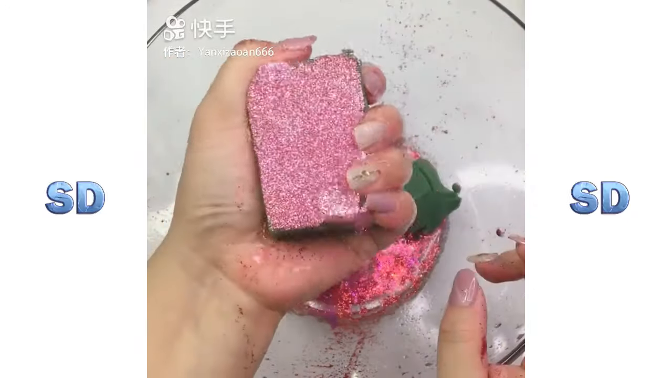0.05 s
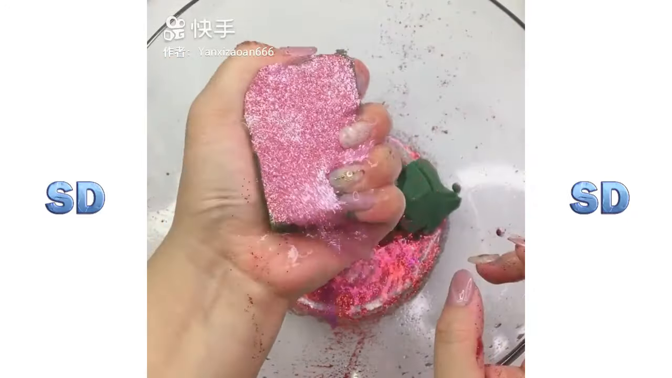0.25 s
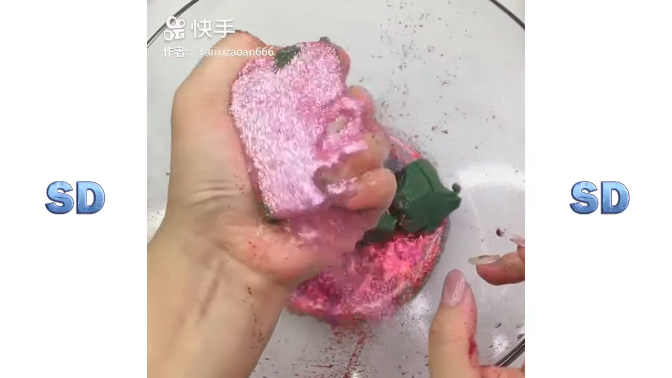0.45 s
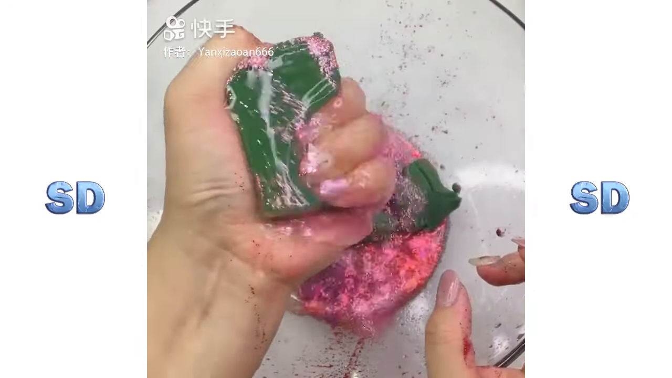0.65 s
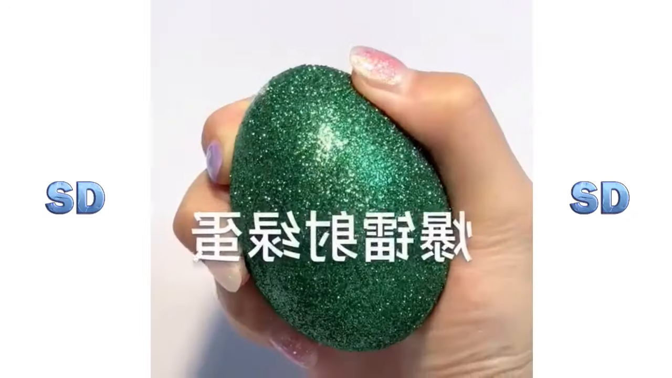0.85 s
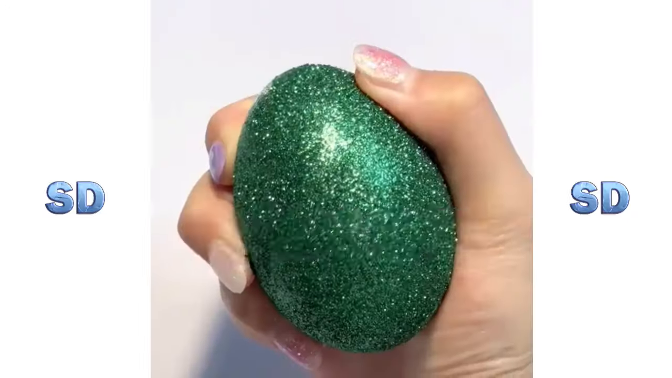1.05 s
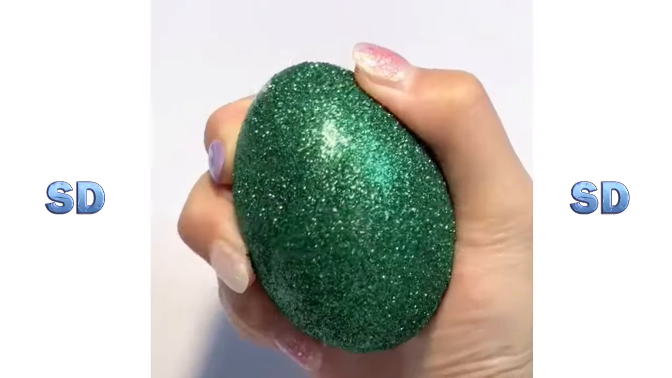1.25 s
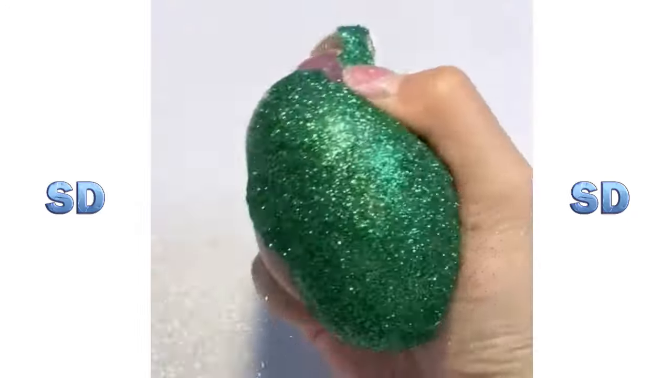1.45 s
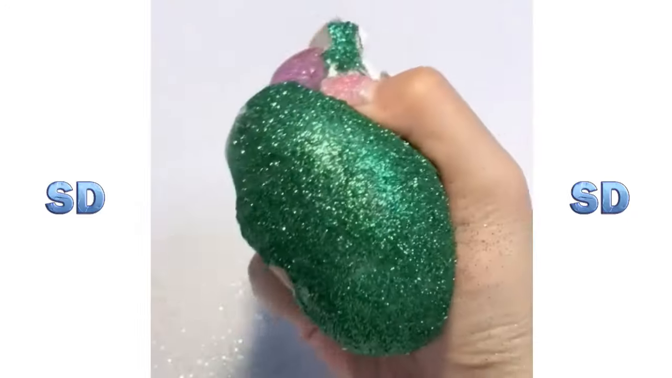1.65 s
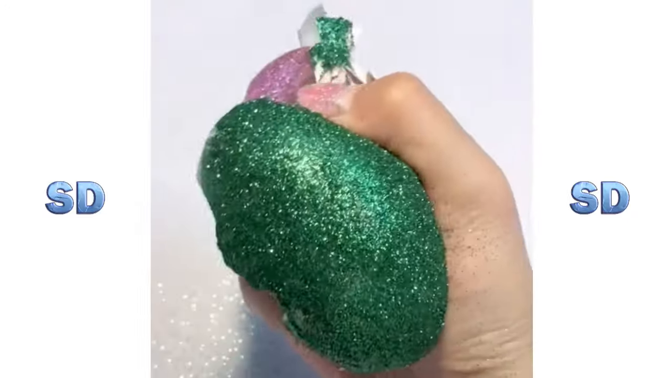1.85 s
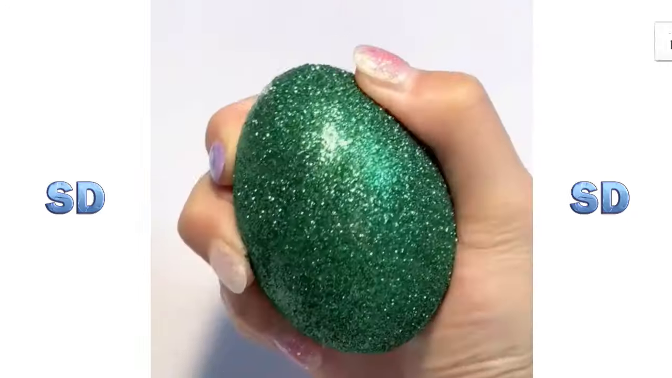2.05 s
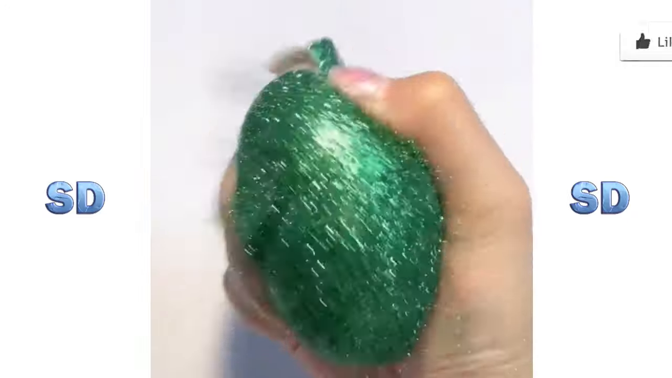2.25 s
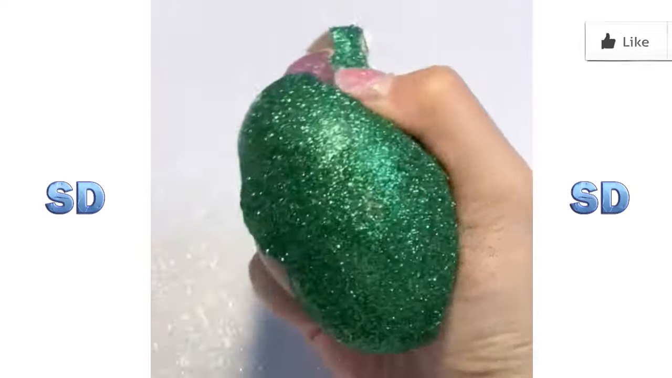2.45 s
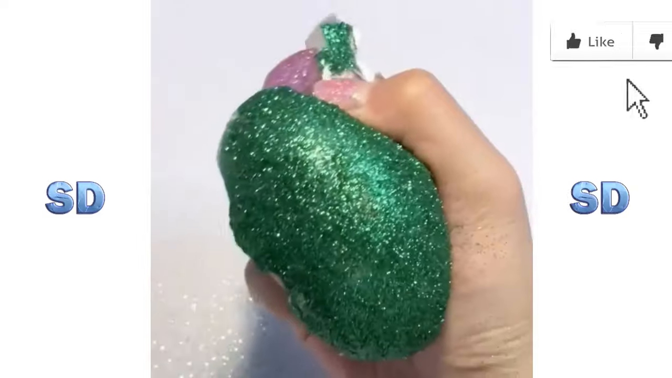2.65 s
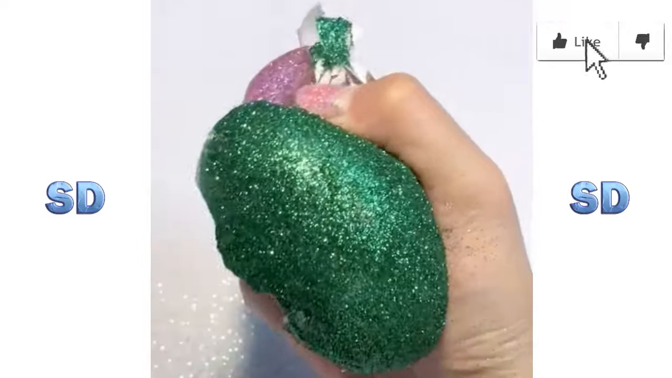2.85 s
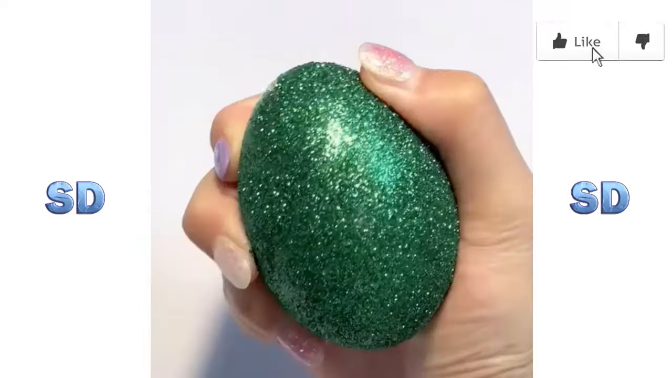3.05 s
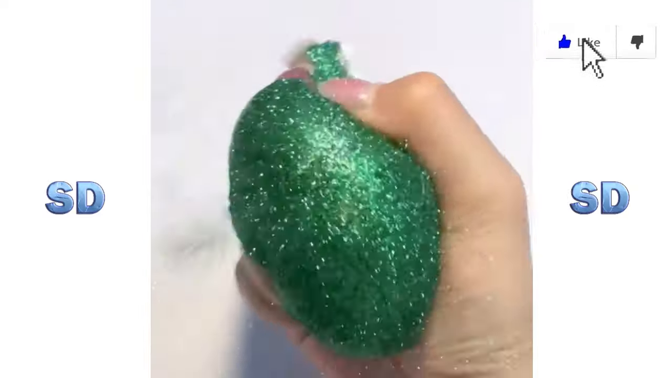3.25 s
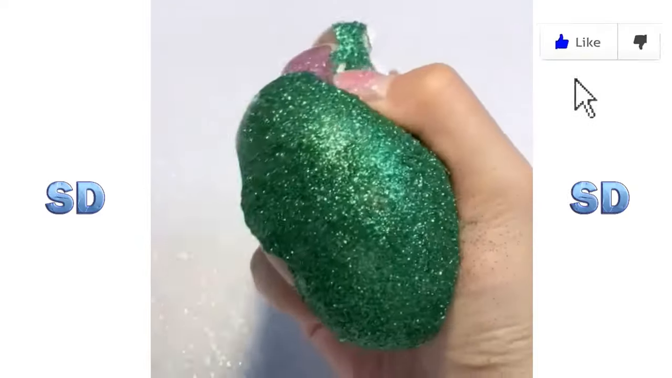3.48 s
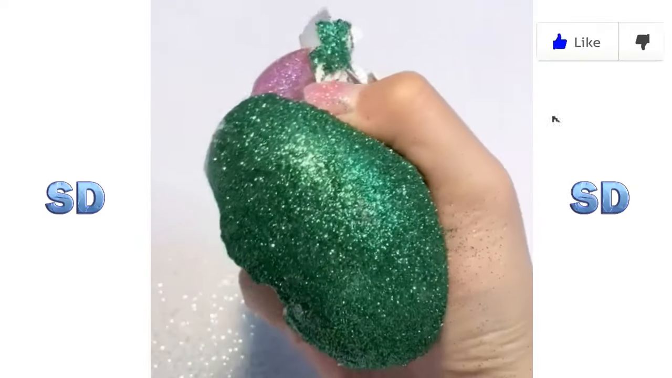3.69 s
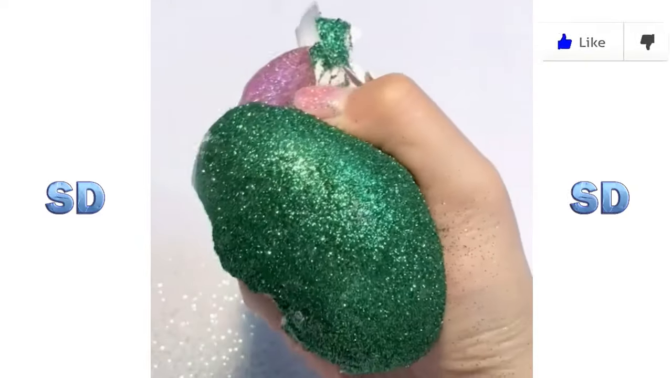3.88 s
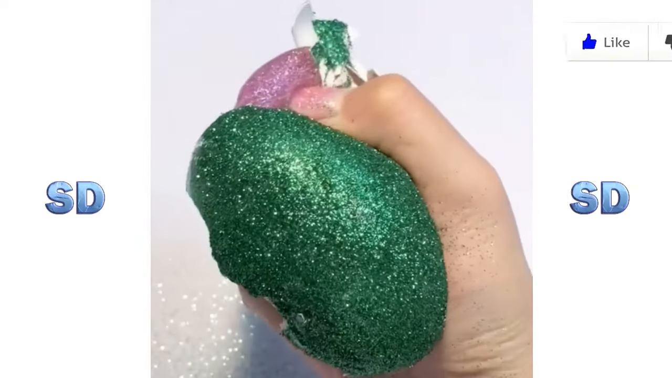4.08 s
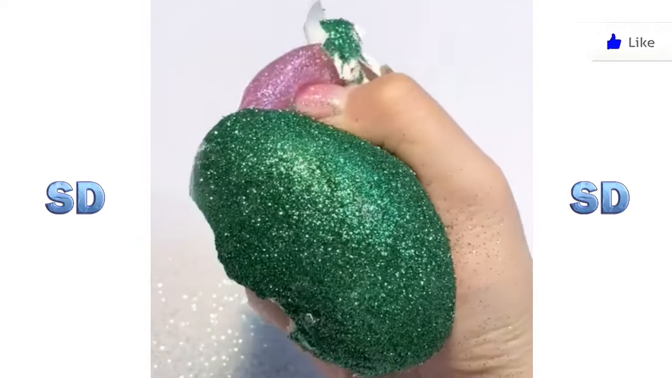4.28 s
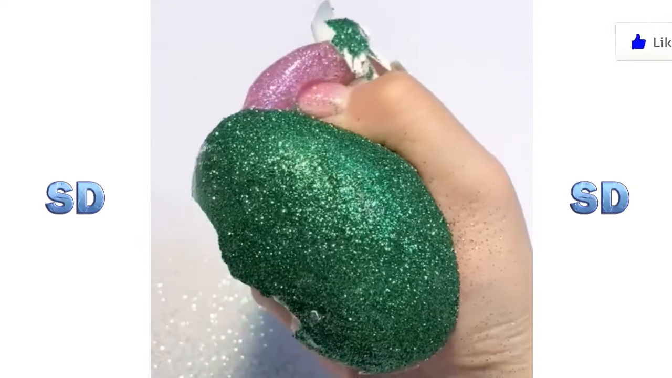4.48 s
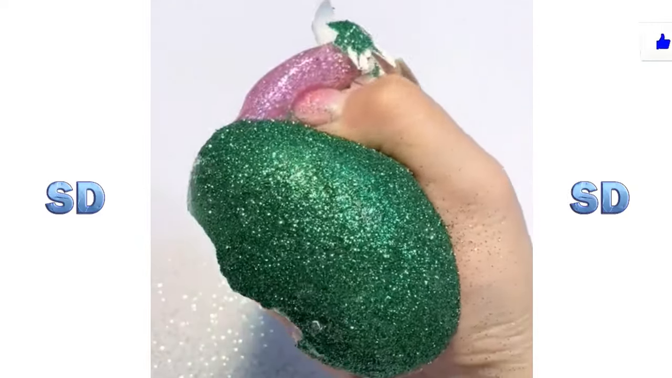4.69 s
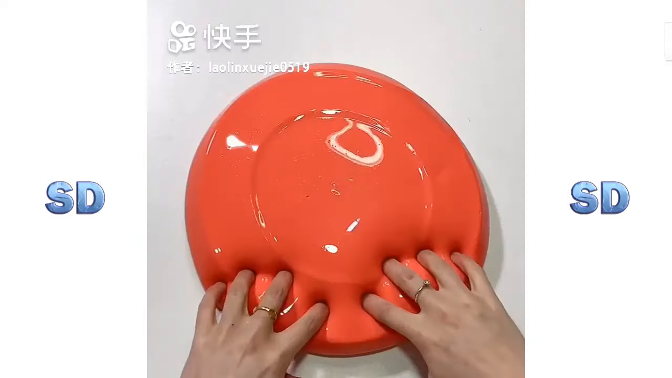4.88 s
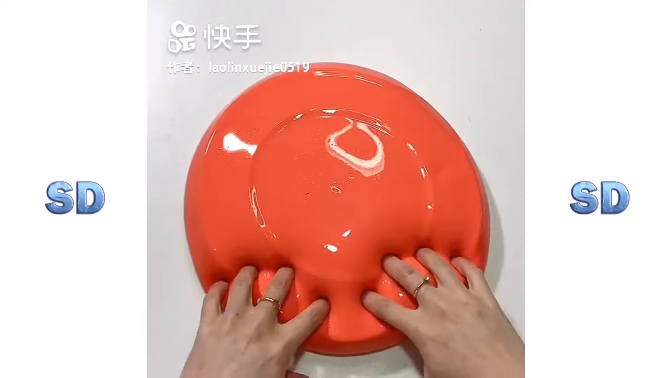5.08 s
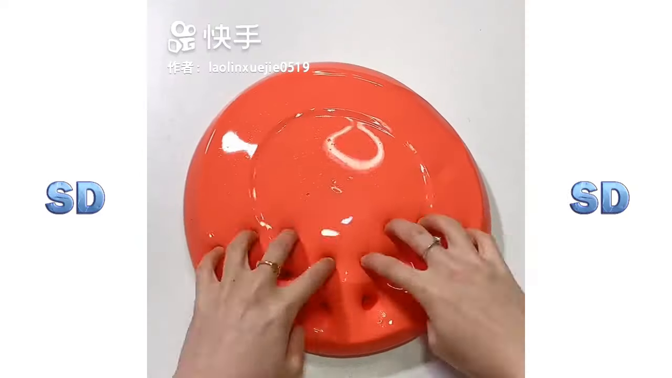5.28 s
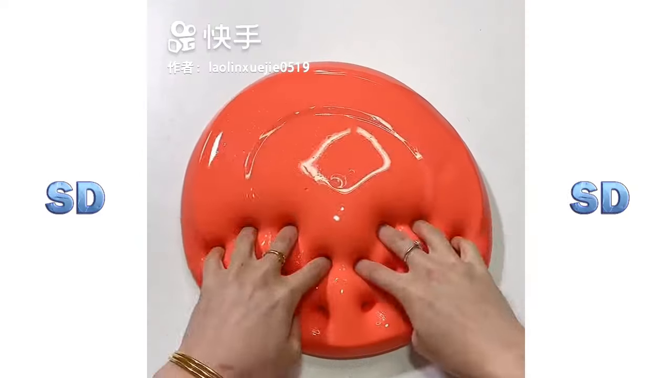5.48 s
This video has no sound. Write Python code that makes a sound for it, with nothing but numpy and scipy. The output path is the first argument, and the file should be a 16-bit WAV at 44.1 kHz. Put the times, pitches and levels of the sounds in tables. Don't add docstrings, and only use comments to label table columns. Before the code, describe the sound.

Three squeezing sounds in a row, dry and close. First, light sparse cracks of foam and its collapsing hiss. Then a much louder putty egg: sharp bright shell snaps, gritty crumbling, a crunchy burst with dull air booms, repeated identically three times, its peaks flattened by a phone limiter. Last, a hushed room with faint rustle, quick finger clicks, a thud, wet hiss and low dish ring, slightly stereo.

```python
import sys
import numpy as np
from scipy import signal
from scipy.fft import rfft, irfft, next_fast_len
from scipy.io import wavfile
from scipy.ndimage import uniform_filter1d

SR = 44100
rng = np.random.default_rng(int(sys.argv[2]) if len(sys.argv) > 2 else 0)


def generate_wav(sig):
    pcm = np.round(np.clip(np.atleast_2d(sig).T, -1, 1) * 32767).astype(np.int16)
    wavfile.write(sys.argv[1], SR, pcm)


def natural_amplitude(level_db):
    exponent = np.asarray(level_db, float) / 20
    return 10 ** exponent


N = 243873
FOAM_END_S, EGG_START_S, EGG_END_S = .778, 1.0, 4.8445

# pitch in Hz, width in Hz, level in dB.
SHELL_MODES = [(3320, 95, -15.5), (3120, 130, -21)]


def foam():
    # start in seconds, peak in dB, ring in Hz,
    # level of the bright part in dB, time to fall 60 dB in seconds.
    big_cracks = [(.3705, -24.5, 9320, -16, .006), (.4028, -25, 5490, -20, .009),
                  (.4199, -22, 4400, -16, .014), (.4274, -17, 4350, -14, .014),
                  (.4403, -11, 4500, -15, .008), (.4528, -14, 4400, -19, .009),
                  (.4622, -14, 4490, -17, .011), (.4887, -15, 9440, -13, .009),
                  (.5071, -13, 4430, -8, .014), (.5114, -17, 2200, -8, .008), (.5312, -19, 5210, -11, .016),
                  (.5498, -10, 4470, -12, .008), (.5927, -27, 990, -4, .012), (.6085, -20, 5800, -14, .01),
                  (.615, -17, 8630, -15, .006), (.6349, -11, 1700, -13, .009), (.638, -13, 6900, -13, .009),
                  (.6662, -16, 7660, -12.5, .013), (.6705, -23, 2620, -12, .016),
                  (.693, -19, 9990, -13, .006), (.7195, -13, 2610, -32, .006), (.7382, -18, 1870, -3, .012),
                  (.7478, -19, 3560, -12, .016), (.7757, -21, 12500, -9, .007)]
    ticks = [(.4236, -23, 5000, -16, .006), (.4565, -27, 7200, -12, .006), (.5215, -25, 10000, -10, .006),
             (.5235, -25, 2200, -14, .008), (.5375, -22, 8500, -12, .007), (.5597, -20, 4600, -14, .008),
             (.5725, -30, 8000, -12, .005), (.578, -29, 7000, -10, .005), (.5905, -22, 8500, -10, .006),
             (.597, -26, 8700, -12, .005), (.6297, -21, 7000, -8, .006), (.6748, -20, 2200, -14, .008),
             (.6827, -22, 5200, -14, .008), (.7013, -21, 4600, -16, .012), (.7525, -20, 4900, -14, .01),
             (.7585, -18, 4000, -14, .008), (.762, -24, 7000, -12, .007)]
    # time in seconds, level in dB.
    grip = [
        (0, -52.5),
        (.37, -50),
        (.47, -46),
        (.53, -38),
        (.58, -43),
        (.7, -41),
        (.76, -38),
        (.776, -41),
    ]
    # pitch in Hz, width in Hz, level in dB.
    bowl_modes = [(2610, 50, -5), (4680, 200, -20)]
    # pitch in Hz, level in dB.
    crumble_colour = [(410, -45), (700, -12.5), (2270, 1), (2590, -2), (5090, -3), (6540, -5), (12500, -9),
                      (15900, -17.5), (16500, -23.5)]
    # pitch in Hz, level in dB.
    room_colour = [(15, -58.5), (25, -35), (46, -10.5), (75, -2.5), (153, -5.5), (216, -11.5), (1200, -25),
                   (1560, -47.5), (2640, -120)]

    grip_db, = in_time(grip)
    crust = cracks(big_cracks + ticks, bowl_modes, [],
                   sharp=3.2, body_db=-15.5, dull_db=-23.5, bright_db=4.5)
    hiss_share = 3.0 * lighter_is_smoother(grip_db + 46)
    crumble = coloured(crumbs(1500, 1.5, sharp=9.6, smooth=hiss_share), crumble_colour)
    crumble = crumbling(grip_db, crust) * with_modes(crumble, bowl_modes, gain_db=-8.0)
    rumble = room(room_colour, -47.5 - .1 * (grip_db + 43.5))
    return (crust + crumble + rumble) * between(-1, FOAM_END_S)


def egg():
    # start in
    # seconds, peak in dB, # ring in Hz, level of the bright part in dB, time to fall 60 dB in seconds.
    shell_cracks = [(1.0675, -20, 6800, -14, .01), (1.0819, -21, 3400, -14, .007),
                    (1.1231, -31, 3250, -17, .009), (1.2645, -22, 3350, -16, .009),
                    (1.2854, -12, 2150, -14, .011), (1.2958, -4.5, 3330, -15, .03),
                    (1.3015, -6, 3290, -15, .02), (1.312, -4, 3140, -15, .017),
                    (1.3186, -4, 3330, -12, .035), (1.3352, -4, 3130, -16, .02),
                    (1.3417, -3, 3310, -11, .03), (1.3582, -13, 3290, -16, .011),
                    (1.3629, -11.5, 3300, -18.5, .018), (1.3784, -22, 3320, -14, .015),
                    (1.3995, -11, 3600, -9, .01), (1.4125, -9, 3600, -8, .008),
                    (1.4148, -6, 3250, -6, .013), (1.5115, -8, 3290, -6, .012),
                    (1.5175, -14, 2300, -9, .009), (1.5265, -5, 3320, -6, .02),
                    (1.7035, -17, 3040, -16, .01), (1.732, -16, 1860, -11, .006), (1.7353, -5, 2850, -20, .014),
              (1.752, -11, 1760, -24, .007), (1.7671, -15, 1870, -22, .008), (1.7757, -6, 4300, -9, .011),
              (1.8007, -9, 2870, -6, .007), (1.817, -21, 6460, -16, .007), (1.8285, -13, 3200, -7, .007),
              (1.8389, -8, 3600, -8, .009), (1.8455, 0, 2000, -7, .016), (1.8592, -9, 8700, -6, .01),
              (1.873, -17, 1750, -13, .009), (1.8927, -5, 5600, -13, .009), (1.8935, -9, 3300, -20, .006),
              (1.9044, -8, 1500, -8, .011), (1.9335, -13, 3300, -20, .006), (1.9329, -5.5, 7200, -14, .012),
              (1.9508, -15, 5140, -10, .01), (1.958, -5, 2300, -11, .009), (1.9641, -5, 7760, -11, .013),
              (1.973, -4, 6530, -12, .013), (1.9816, -4, 7350, -15, .011), (2.0015, -4, 2690, -7, .015),
                    (2.0349, -20, 6580, -10, .008), (2.069, -15, 6530, -14, .01), (2.0762, -4, 6700, -11, .016),
              (2.081, -12, 6480, -14, .01), (2.0844, -6, 6800, -13, .012), (2.1176, -11, 11800, -11, .005),
              (2.1315, -6, 9500, -10, .01), (2.1381, -4, 6780, -17, .01), (2.149, -13, 8750, -9, .018),
              (2.1561, -13, 6520, -12.5, .008), (2.1687, -7, 8700, -9, .01), (2.1804, -6.5, 3680, -8, .014),
              (2.1847, -2, 1600, -6, .028), (2.1959, -9, 3600, -12, .018), (2.203, -9, 1860, -9, .014),
              (2.2153, -5, 6490, -14, .012), (2.2409, -4, 8710, -9, .011), (2.2732, -2, 1990, -8, .022),
              (2.281, -1.5, 5900, -13, .014),
                    (4.246, -3, 1990, -9, .022), (4.2545, -4, 5600, -13, .01), (4.2725, -3, 3230, -6, .022),
             (4.283, -7, 3230, -12, .009), (4.2928, -2, 3150, -12, .025), (4.3086, -9, 8500, -11, .01),
             (4.3202, -2, 2000, -6, .024), (4.3363, -5, 6750, -10, .01), (4.364, -8, 3230, -10, .007),
             (4.3918, -2, 3830, -3, .015), (4.4005, -6, 3600, -8, .01), (4.409, -7, 3170, -8, .018),
             (4.4192, -7, 6000, -14, .006),
                    (4.447, 0, 1100, -6, .018), (4.4626, -3, 3180, -12, .018), (4.4707, -3, 6820, -10, .02),
                   (4.4822, -4.5, 5480, -12, .014), (4.4957, -7, 1960, -12, .009),
                   (4.496, -9, 6600, -14, .008), (4.5153, -5.5, 6410, -14, .009),
                   (4.548, -5, 2050, -9, .009), (4.5565, -13, 1860, -9, .018), (4.568, -5, 3250, -12, .01),
                   (4.5885, 0, 2000, -12, .02), (4.6009, -12, 1950, -9, .012),
                   (4.6074, -7, 4100, -10, .008), (4.613, -5, 1900, -14, .01),
                   (4.6689, -21, 4090, -10, .009), (4.6845, -9, 1920, -11, .009),
                   (4.6961, -10, 4000, -4, .014), (4.7205, -2, 8900, -7, .017),
                   (4.8324, -17, 6550, -8, .006), (4.8418, -19, 1770, -16, .009)]
    ticks = [(1.2259, -30, 5330, -10, .007), (1.2895, -17, 3500, -14, .008), (1.3285, -12, 3300, -14, .012),
             (1.3505, -12, 3200, -14, .012), (1.371, -20, 3300, -14, .012), (1.4105, -19, 2300, -14, .006),
             (1.668, -15, 7000, -8, .007), (1.745, -17, 5500, -9, .005), (1.7635, -22, 1900, -14, .006),
             (1.781, -18, 8800, -9, .008), (1.794, -24, 4000, -10, .005), (1.8105, -25, 6000, -12, .006),
             (1.9115, -22, 1700, -14, .006), (1.918, -22, 3800, -8, .005), (2.062, -24, 4000, -14, .008),
             (2.2755, -6, 2200, -9, .012), (2.287, -10, 3300, -12, .01), (4.263, -12, 2200, -9, .008),
             (4.3005, -9, 6000, -9, .01), (4.331, -10, 8500, -9, .009), (4.342, -11, 6500, -9, .008),
             (4.3505, -14, 6200, -9, .007), (4.3725, -15, 3300, -14, .008), (4.384, -20, 3300, -12, .007),
             (4.4125, -7, 6000, -8, .012), (4.4235, -12, 8500, -12, .006), (4.4578, -12, 1200, -12, .012),
             (4.4755, -9, 2900, -10, .012), (4.5063, -15, 2200, -8, .006), (4.6379, -22, 2040, -13, .009)]
    # time in seconds, level in dB.
    grip = [(1.0, -40), (1.26, -44.5), (1.3, -22), (1.35, -22), (1.39, -34), (1.47, -41), (1.74, -37),
            (2.06, -38), (2.2, -28), (2.25, -36), (2.2925, -23), (4.243, -25), (4.34, -24), (4.375, -35),
            (4.47, -26), (4.53, -36), (4.6, -31), (4.844, -41)]
    # pitch in Hz, width in Hz, level in dB.
    high_modes = [(6600, 700, -9), (8700, 800, -11)]
    # pitch in Hz, level in dB.
    crumble_colour = [(350, -30), (600, -7.5), (3000, 1.5), (3440, -2.5), (4870, -4.5), (6610, 1.5),
                      (15200, -5), (16500, -27.5)]
    # pitch in Hz, level in dB.
    room_colour = [(18, -33.5), (30, -9), (47, 2), (75, -5), (130, 0.5), (210, -5), (330, -9), (620, -16),
                   (1000, -23), (1500, -45.5)]
    loop_start_s, loop_samples = 1.3175, 43008
    fade_in_s, fade_in_db = 0.089, -29

    grip_db, = in_time(grip)
    all_cracks = shell_cracks + ticks
    shell = cracks(all_cracks, SHELL_MODES, high_modes,
                   sharp=2.6, body_db=-7.0, dull_db=-7.5, bright_db=6.5)
    hiss_share = 1.21 * lighter_is_smoother(grip_db + 33)
    crumble = coloured(crumbs(4000, 1.6, sharp=5.2, smooth=hiss_share), crumble_colour)
    crumble = crumbling(grip_db, shell) * with_modes(crumble, SHELL_MODES, gain_db=-1.5)
    out = shell + crumble + burst() + room(room_colour, -34.5 + .2 * (grip_db + 33.5))
    start = round(loop_start_s * SR)
    out[start:start + 3 * loop_samples] = np.tile(out[start:start + loop_samples], 3)
    fade_db, = in_time([(EGG_START_S, fade_in_db), (EGG_START_S + fade_in_s, 0)])
    return out * natural_amplitude(fade_db) * between(EGG_START_S, EGG_END_S)


def burst():
    # pitch in Hz, level in dB.
    crunch_colour = [(150, -7.5), (250, -4.5), (999, -6.5), (1370, -4), (10800, -6), (15700, -10.5),
                     (16500, -39)]
    # peak time in seconds, peak in dB, pitch in Hz,
    # time to rise 60 dB in seconds, time to fall 60 dB in seconds.
    booms = [
        (1.55, -31, 295, 0.04, .3),
        (1.58, -24, 128, .12, .1),
        (1.583, -29, 56, 0.27, 0.1),
        (1.62, -16, 121, .16, .1),
        (1.632, -24, 199, .25, 0.27),
        (1.648, -22.5, 172, 0.14, 0.22),
        (1.68, -23, 124, .2, .36),
    ]
    start_s, attack_s, hold_s, fall_db_per_s = 1.521, .007, 0.085, 229
    pitch_sag_hz_per_s = 99

    full_s = start_s + attack_s
    held_s = full_s + hold_s
    crunch_db, = in_time([(start_s, -17), (full_s, 0), (held_s, 0), (held_s + 1, -fall_db_per_s)])
    rubble = grains(9800, 2.67, smooth=0.58) + 0.5 * crumbs(2500, 2.7, sharp=7.3, smooth=0)
    crunch = natural_amplitude(-11.5 + crunch_db) * with_modes(coloured(rubble, crunch_colour), SHELL_MODES, gain_db=-3.0)
    boom = 0
    for s, db, hz, rise_s, fall_s in booms:
        t = np.arange(N) / SR - s
        wave = np.cos(2 * np.pi * t * (hz - pitch_sag_hz_per_s * t / 2))
        boom = boom + natural_amplitude(db) * swell(s, rise_s, fall_s) * wave
    return crunch * between(start_s, 9) + np.sqrt(2) * boom


def slime():
    # start in seconds, peak in dB, ring in Hz,
    # level of the bright part in dB, time to fall 60 dB in seconds.
    slaps = [
        (5.3897, -13, 9800, -9.5, .011),
        (5.4052, -17, 8500, -14, .008),
        (5.4085, -13, 8800, -12, .012),
    ]
    # pitch in Hz, level in dB.
    wet_colour = [(410, -41.5), (700, -17.5), (1410, -8.5), (8750, -9), (14500, -11.5), (16500, -68.5)]
    thud_colour = [(80, -20), (200, -3), (800, -3.5), (1300, -7), (2500, -64)]
    room_colour = [(15, -41), (25, 1), (106, -3.5), (145, 3.5), (174, -9), (340, -7), (397, -22),
                   (12000, -78), (15600, -95), (22000, -120)]

    wet = coloured(grains(6000, 4.9, smooth=2.9), wet_colour)
    tail = natural_amplitude(-31.5) * swell(5.412, rise_s=0.15, fall_s=.36) * wet
    thud = coloured(rng.standard_normal(N), thud_colour)
    tail += natural_amplitude(-37) * swell(5.42, rise_s=.12, fall_s=0.46) * thud
    clicks = cracks(slaps, [], [], sharp=3.9, body_db=0, dull_db=5.0, bright_db=3.0)
    slap = clicks + tail * between(5.385, 9)
    return (slap + dish() + rustle() + room(room_colour, -55)) * between(EGG_END_S, 9)


def dish():
    # pitch in Hz, level in dB, time to fall 60 dB in seconds.
    dish_modes = [(88, -38, .6), (140, -38, .3), (228, -31, .5), (322, -25, 0.18), (448, -19, 0.046),
                  (538, -40, .3), (725, -22, 0.065), (834, -40, .4), (1020, -36, .12), (1244, -42, .4)]
    hit_s = 5.417
    t = np.maximum(np.arange(N) / SR - hit_s, 0)
    ring = sum(natural_amplitude(db - 60 * t / t60) * np.sin(2 * np.pi * hz * t) for hz, db, t60 in dish_modes)
    return ring * (1 - np.exp(-t / 0.00083))


def cracks(table, modes, tops, sharp, body_db, dull_db, bright_db):
    size = 2048
    out = np.zeros(N + size)
    t = np.arange(size) / SR
    near, near_db = .06, 18
    body_takes_db = 8.0
    lag_s = .0004
    swell_share, brittle_share, strike_share = .04, .76, .8
    linger = 1.65
    thud = signal.butter(2, [220, 750], "band", fs=SR, output="sos")
    dull = signal.butter(3, [750, 2500], "band", fs=SR, output="sos")
    middle = signal.butter(2, [2500, 6000], "band", fs=SR, output="sos")
    bright = signal.butter(2, 6000, "high", fs=SR, output="sos")
    wide = signal.butter(2, [1100, 12000], "band", fs=SR, output="sos")
    noise = rng.standard_normal((len(table), 3, size))
    for (s, peak_db, hz, top_db, t60), (white, uneven, luck) in zip(table, noise):
        is_near = [abs(hz / f - 1) < near for f, _, _ in modes]
        taken_db = body_takes_db * any(is_near)
        low_db = dull_db - 7.5 * np.log2(hz / 3000) + 4.0 * np.log2(t60 / .012) - taken_db
        high_db = bright_db + top_db
        middle_db = (low_db + high_db) / 2

        snap = natural_amplitude(-60 * (t / (brittle_share * t60)) ** linger)
        settling = .035 * natural_amplitude(-60 * t / (3.0 * t60))
        shape = (1 - np.exp(-t / (swell_share * t60))) * (snap + settling)
        volley = white * natural_amplitude(1.4 * uneven) * shape
        strike = volley * natural_amplitude(-60 * t / (strike_share * t60))
        first = volley * natural_amplitude(-60 * t / 0.0025)

        parts = [(double_resonance(volley, hz, hz / sharp), -4.5 - taken_db),
                 (signal.sosfilt(dull, volley), low_db),
                 (signal.sosfilt(middle, volley), middle_db + 1.5),
                 (signal.sosfilt(bright, volley), high_db),
                 (signal.sosfilt(wide, first), middle_db - 3.5),
                 (signal.sosfilt(thud, volley), low_db - 10.5)]
        for (f, width_hz, db), z in zip(tops, luck):
            parts.append((resonance(volley, f, width_hz), db + high_db + 4.0 * z))
        for (f, width_hz, db), close in zip(modes, is_near):
            parts.append((resonance(strike, f, width_hz), db + body_db + near_db * close))
        crack = sum(natural_amplitude(db) * rms_one(part) for part, db in parts)
        at = round((s + lag_s) * SR)
        out[at:at + size] += natural_amplitude(peak_db) * crack / np.max(np.abs(crack))
    return out[:N]


def crumbling(grip_db, snaps):
    aftermath_db, aftermath_s = -14, 0.01
    r = np.exp(-1 / (aftermath_s * SR))
    recent_power = signal.lfilter([1 - r], [1, -r], snaps ** 2)
    return np.sqrt(natural_amplitude(2 * grip_db) + natural_amplitude(2 * aftermath_db) * recent_power)


def lighter_is_smoother(grip_db):
    return np.exp(-.046 * grip_db)


def crumbs(per_s, spread_db, sharp, smooth):
    clicks = grains(per_s, spread_db, smooth=0)
    pitches = np.geomspace(900, 14000, 12)
    dealt = rng.integers(0, len(pitches), N)
    rings = 0
    for k, hz in enumerate(pitches):
        ring = resonance(clicks * (dealt == k) + 1e-18, hz, hz / sharp)
        rings = rings + np.sqrt(hz) * rms_one(ring)
    slow = uniform_filter1d(rng.standard_normal(N), size=250)
    clumps = rms_one(uniform_filter1d(slow, size=250))
    mixed = natural_amplitude(3.0 * clumps) * rms_one(rings) + smooth * rng.standard_normal(N)
    return mixed / np.sqrt(1 + smooth ** 2)


def grains(per_s, spread_db, smooth):
    sizes = natural_amplitude(spread_db * np.minimum(rng.exponential(1, N), 5)) * rng.choice([-1, 1], N)
    clicks = rms_one(sizes * (rng.random(N) < per_s / SR))
    return rms_one(clicks + smooth * rng.standard_normal(N))


def rustle():
    sleeve = rms_one(double_resonance(rng.standard_normal(N), 1100, 1200))
    settling = rms_one(double_resonance(rng.standard_normal(N), 420, 280))
    out = natural_amplitude(-74) * swell(5.12, rise_s=.45, fall_s=.5) * sleeve
    return out + natural_amplitude(-64) * swell(4.95, rise_s=.6, fall_s=.6) * settling


def room(spectrum, level_db):
    return natural_amplitude(level_db) * coloured(rng.standard_normal(N), spectrum)


def with_modes(x, modes, gain_db):
    return x + sum(natural_amplitude(gain_db + db) * rms_one(resonance(x, hz, width_hz)) for hz, width_hz, db in modes)


def resonance(x, hz, width_hz):
    r = np.exp(-np.pi * width_hz / SR)
    poles = [1, -2 * r * np.cos(2 * np.pi * hz / SR), r * r]
    return signal.lfilter([(1 - r * r) / 2, 0, (r * r - 1) / 2], poles, x)


def double_resonance(x, hz, width_hz):
    return resonance(resonance(x, hz, width_hz), hz, width_hz)


def swell(peak_s, rise_s, fall_s):
    t = np.arange(N) / SR - peak_s
    return uniform_filter1d(natural_amplitude(-60 * np.maximum(-t / rise_s, t / fall_s)), size=300)


def coloured(x, spectrum):
    return rms_one(shaped(x, spectrum))


def shaped(x, spectrum):
    hz, level_db = np.transpose(spectrum)
    size = next_fast_len(N)
    bins = np.maximum(np.arange(size // 2 + 1) * SR / size, 1)
    gain = natural_amplitude(np.interp(np.log(bins), np.log(hz), level_db))
    return irfft(rfft(x, size) * gain, size)[:N]


def rms_one(x):
    return x / np.sqrt(np.mean(x ** 2) + 1e-20)


def in_time(rows):
    s, *columns = np.transpose(rows)
    return [np.interp(np.arange(N) / SR, s, c) for c in columns]


def between(t0, t1):
    t = np.arange(N) / SR
    return np.clip(np.minimum(t - t0, t1 - t) / .002, 0, 1)


def scene():
    # pitch in Hz, left-right difference over the middle in dB.
    slime_width = [(60, -19), (250, -20), (700, -8.5), (1300, -1), (5000, -4.5), (8700, 8), (12000, 1.5)]
    mid = foam() + egg() + slime()
    side = shaped(slime(), slime_width) * between(EGG_END_S, 9)
    return np.array([mid - side, mid + side])


def top_cut(x):
    return signal.sosfilt(signal.butter(12, 16820, fs=SR, output="sos"), x)


def record(dry):
    ceiling = .47
    flat = dry / (1 + np.abs(dry / ceiling) ** 4) ** .25
    treble_cut = signal.cheby2(10, 50, 16800, fs=SR, output="sos")
    return top_cut(signal.sosfilt(treble_cut, flat))


dry = scene()
out = record(dry)
generate_wav(out)
```